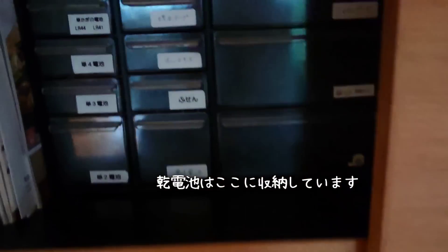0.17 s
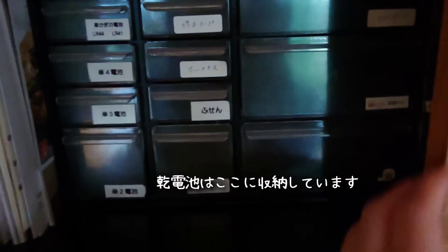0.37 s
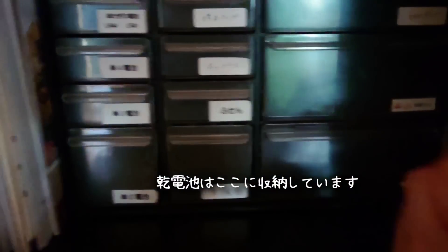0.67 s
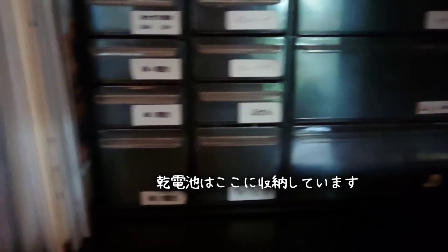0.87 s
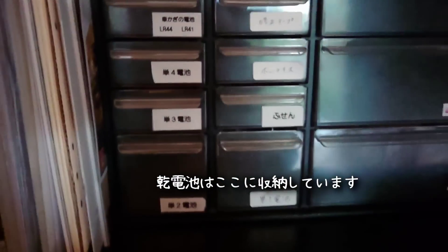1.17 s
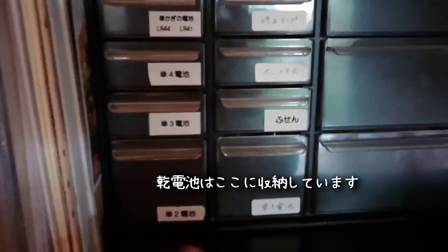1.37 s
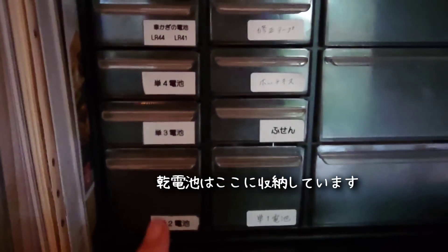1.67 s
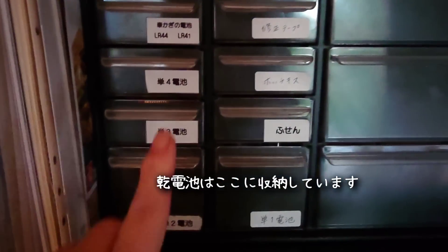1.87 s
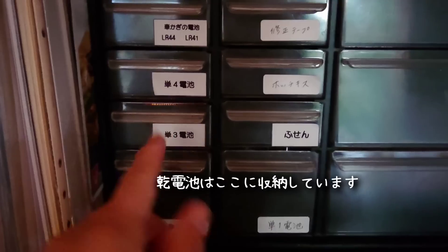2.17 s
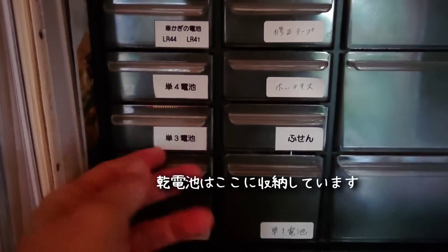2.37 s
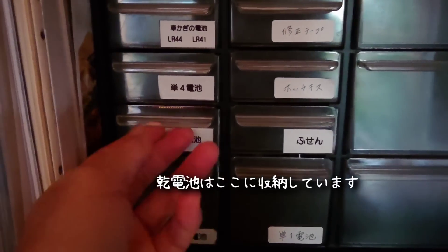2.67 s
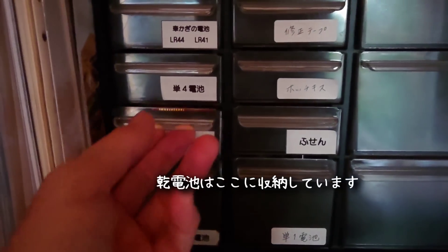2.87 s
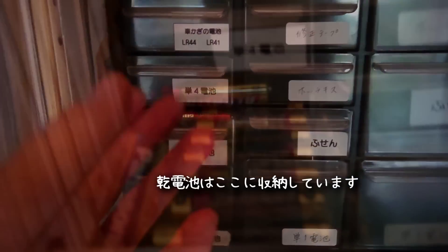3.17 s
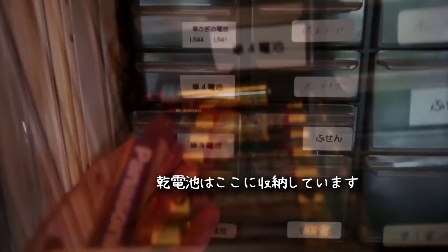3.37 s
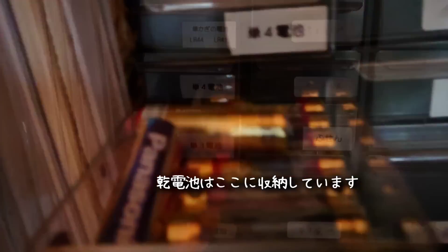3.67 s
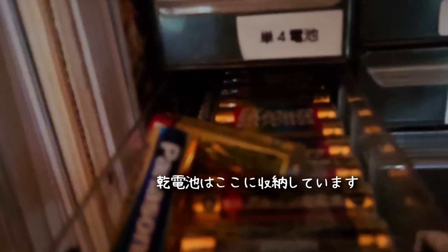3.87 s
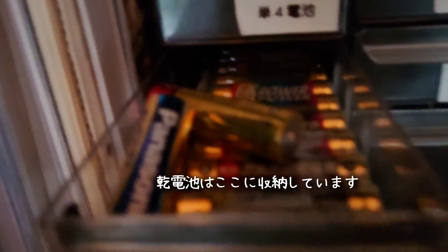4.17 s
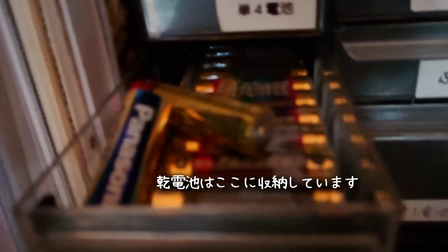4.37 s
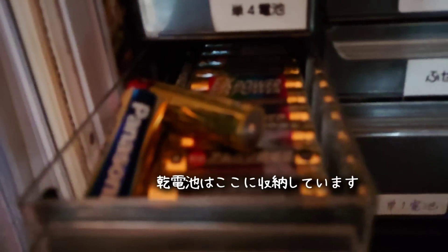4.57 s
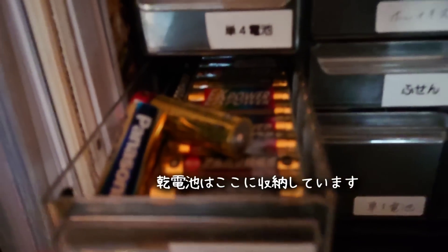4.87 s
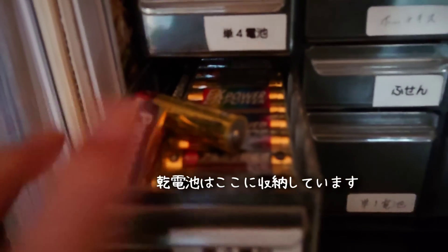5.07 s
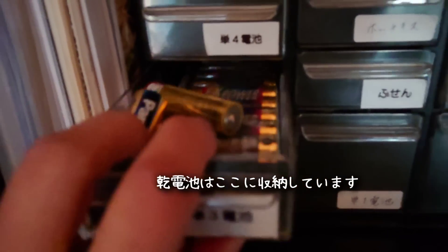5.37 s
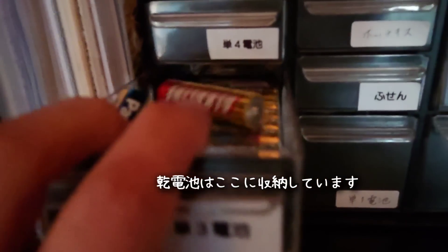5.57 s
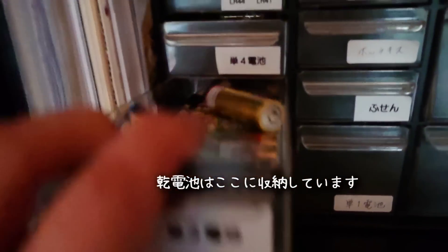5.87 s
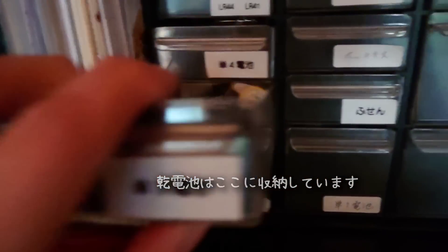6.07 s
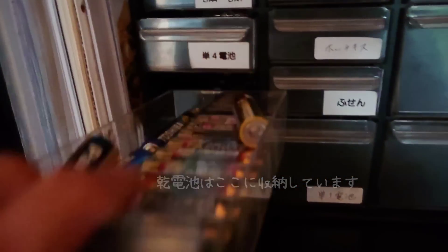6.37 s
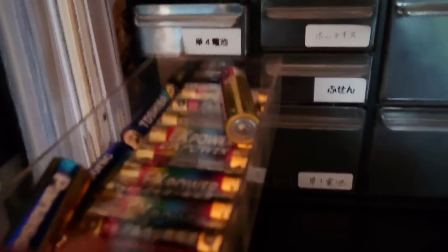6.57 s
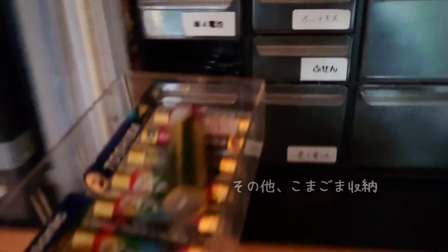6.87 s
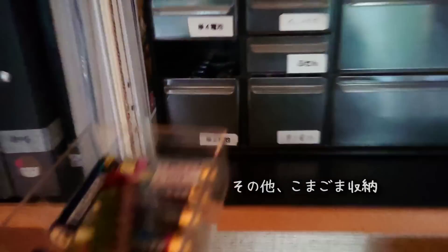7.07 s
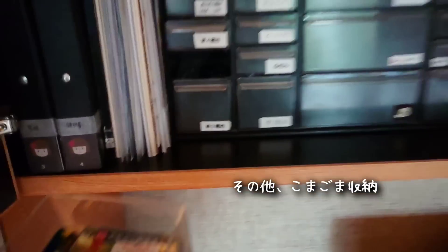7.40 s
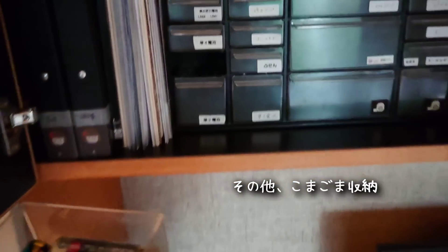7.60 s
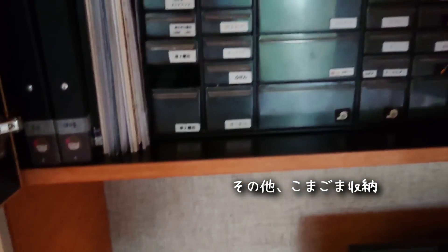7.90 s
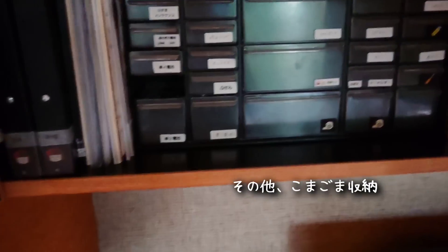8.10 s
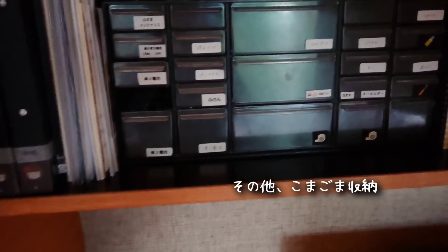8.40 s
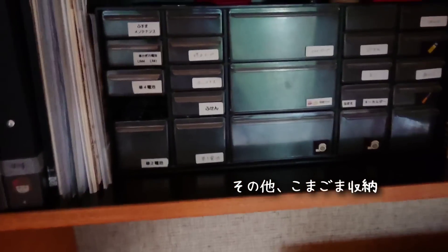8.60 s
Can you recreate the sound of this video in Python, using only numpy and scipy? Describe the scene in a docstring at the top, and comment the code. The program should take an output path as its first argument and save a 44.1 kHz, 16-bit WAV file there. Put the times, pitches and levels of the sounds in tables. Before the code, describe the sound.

Over quiet mains hum, a woody door knock, then close plastic clacks and rattling batteries as a little drawer is pulled out and put down.

```python
"""Under a wavering mains hum, room rumble and a faint hiss, a wooden cabinet door bumps against its stop.
Then a small plastic drawer full of batteries is pulled out, rattles, is pushed about and set down on the floor.
Half-sine pushes ring the cabinet panels; flurries of micro-contacts ring the drawer, its cells and the catch.
Grainy noise makes the slides, shaped noise the hissy rubs, and decaying noise the reverb, on two close ports."""
import sys
import numpy as np
from scipy import signal
from scipy.fft import rfft, irfft, next_fast_len
from scipy.io import wavfile
from scipy.ndimage import uniform_filter1d

SR = 44100
rng = np.random.default_rng(int(sys.argv[2]) if len(sys.argv) > 2 else 0)


def put_to_file(sound):
    """Save the sound as 16-bit audio at rate SR, in the file named by the first command-line argument."""
    columns = np.atleast_2d(sound).T  # one column per channel
    safe = np.clip(columns, -1, 1)
    whole_steps = np.round(safe * 32767)
    wavfile.write(sys.argv[1], SR, whole_steps.astype(np.int16))


N = 385434

# background over time: time_s, rumble_db, hum_db (before its waver and port trims), background_hiss_db
BACKGROUND_LEVELS = [(0, -57, -57, -69), (.87, -51.5, -57, -63.5), (1.36, -54, -52.5, -64.5),
                     (2.56, -57, -51.5, -73.5), (3.6, -47.5, -48, -61.5), (4.2, -56, -50.5, -70.5),
                     (5.33, -57, -50.5, -72.5), (6.35, -52, -49.5, -68), (7.5, -60.5, -53, -67),
                     (8.74, -55, -56, -63)]
# knocks of drawer and cells, in the hand until LAID_S, then on the floor: start_s, level_db,
# boom_db, clink_db (both relative to level_db), knock_pitch_hz, clink_pitch_hz, chatter_ms
DRAWER_KNOCKS = [(2.713, -41, -4, -19, 1070, 2330, 4.9), (2.739, -40.5, -1, -3, 1100, 2420, 4.6),
                 (2.792, -42, -7, -9, 1420, 4170, 3.5), (2.957, -39, 6, -33, 1150, 2470, 2.4),
                 (3.044, -46, 3, -7, 1820, 2440, 3.5), (3.06, -18, -10, -9, 1110, 2960, 6.3),
                 (3.098, -37.5, 5.5, -12, 1400, 2360, 6.4), (3.15, -37.5, 3, 6, 1350, 3920, 3.2),
                 (3.222, -39, 5, -13, 1080, 2700, 5.5), (3.239, -23.5, 3, 0, 1140, 2740, 5.9),
                 (3.25, -13, -7, 2.5, 1320, 3950, 3.1), (3.293, -10, -0.5, -4.5, 1880, 2520, 5.1),
                 (3.32, -15, -19, -2.5, 1690, 3320, 3.8), (3.584, -14.5, -7, -7.5, 1340, 2950, 3.1),
                 (3.695, -16.5, -15, -3, 1270, 4300, 3.7), (3.702, -19.5, -5, -2.5, 1350, 3030, 2.4),
                 (3.741, -22.5, -14, -19, 1470, 2490, 2.5), (3.799, -12.5, -34, -2.5, 1450, 4000, 3.1),
                 (3.806, -21.5, -11, -4, 1300, 3170, 3.4), (3.863, -36.5, 0, 1, 1100, 3480, 3.5),
                 (3.897, -8.5, -15.5, -9.5, 1394, 2980, 2.94), (3.975, -35, -19, -20, 1280, 2690, 2.8),
                 (4.001, -18.5, -45, -16, 1350, 2650, 2.7), (4.021, -40.5, -22, 10, 1370, 3280, 2.8),
                 (4.057, -29, -1, -18, 1330, 3100, 4.3), (4.077, -25.5, -7, -17, 1360, 3030, 1.1),
                 (4.117, -38, -31, -23, 1350, 2750, 5.8), (4.289, -58.5, 1, 22, 1920, 3400, 2.2),
                 (4.364, -63, -20.5, 13, 1820, 2960, 3.5), (5.324, -36, -8.5, -3, 1400, 4500, 7.9),
                 (5.354, -22.5, -8, -3, 1470, 3100, 2.9), (5.528, -43, -20, -28, 1270, 2470, 3.5),
                 (5.542, -58, 15, -21, 1100, 2580, 4.7), (5.558, -23.5, 5, -3, 1360, 3650, 3.1),
                 (5.576, -21, -7, -5.5, 1210, 3650, 2.8), (5.602, -43, 8.5, -12, 1190, 2380, 5.6),
                 (5.642, -42, 9, 2, 1310, 4350, 9.4), (5.753, -24, -12, -15, 1260, 3100, 3.1),
                 (5.776, -24, -9.5, -33, 1430, 2420, 3.9), (5.838, -34, 1, -14, 1330, 3360, 3.2),
                 (5.998, -44, 6.5, -11, 1300, 2150, 3.2), (5.979, -36.5, -6, -17, 1380, 2940, 4.1),
                 (6.05, -38.5, -15, 11.5, 1300, 3730, 5.5), (6.064, -32.5, 5, -1, 1290, 2800, 6.7),
                 (6.075, -16.5, -2, -2, 1260, 2100, 3.3), (6.088, -38.5, 12.5, -10, 1350, 3310, 4.8),
                 (6.102, -35, -14, -6, 1090, 4360, 2.3), (6.144, -26, -5, 3.5, 1350, 4300, 4.8),
                 (6.177, -29, -5.5, 4, 1350, 4100, 4.4), (6.249, -23.5, -5.5, -8.5, 1780, 2570, 3),
                 (6.299, -16, -11, -15, 1440, 2070, 5.3), (6.346, -29, -1, -21, 1220, 2180, 2.8),
                 (6.356, -34.5, 0, -3, 1380, 4760, 8.8), (6.398, -39, 6, 5.5, 1250, 3500, 4.1),
                 (6.477, -15, -6.5, -3, 1196, 2740, 5), (6.61, -35.5, 1, 3, 1400, 4100, 3.5),
                 (7.063, -45.5, -5, 5.5, 1040, 2930, 1.8), (7.248, -41, 0, -27, 1100, 2710, 3.9),
                 (7.446, -35, -2.5, -9.5, 1770, 3380, 3.5), (7.472, -40, 1.5, -18, 1440, 2290, 3),
                 (7.603, -22.5, -9, -14, 1720, 2910, 10.3), (7.623, -14.5, -13, -4.5, 1810, 2930, 5.5),
                 (7.651, -12, -15.5, 1, 1900, 2900, 6.7), (7.679, -17.5, -17, 0, 1580, 3000, 10.5),
                 (7.706, -12.5, -9.5, -2, 1780, 3630, 8.1), (7.796, -24, -13, -34, 1520, 3670, 9),
                 (7.962, -38.5, 4, -23, 1710, 3350, 8.8), (7.973, -23.5, -24, -5.5, 1800, 3640, 2.3),
                 (8.082, -33, 0, -1.5, 1800, 3340, 2.15), (8.576, -46.5, 6, -6, 1300, 2610, 3.7)]
LAID_S = 7.15  # from here the drawer lies on the floor


def undb(db):
    """Gain of a level in dB."""
    return 10 ** (np.asarray(db) / 20)


def unit(x):
    """Scale to rms 1."""
    return x / np.sqrt(np.mean(x ** 2))


def curve(table, column):
    """A table column over time."""
    rows = np.array(table)
    return np.interp(np.arange(N) / SR, rows[:, 0], rows[:, column])


def band(x, lo_hz, hi_hz):
    """Band-pass with edges kept in range."""
    lo_hz = np.clip(lo_hz, 10, .4 * SR)
    hi_hz = np.clip(hi_hz, 1.02 * lo_hz, .45 * SR)
    return signal.sosfilt(signal.butter(2, [lo_hz, hi_hz], "band", fs=SR, output="sos"), x)


def steep_band(x, lo_hz, hi_hz):
    """The same band-pass three times over, for steeper skirts."""
    for _ in range(3):
        x = band(x, lo_hz, hi_hz)
    return x


def coloured(spectrum):
    """Noise with a spectrum of (Hz, dB) points, rms 1."""
    hz, db = np.transpose(spectrum)
    size = next_fast_len(N)
    f = np.arange(1, size // 2 + 2) * SR / size
    gain = undb(np.interp(np.log(f), np.log(hz), db))
    white = rfft(rng.standard_normal(size))
    return unit(irfft(white * gain, size)[:N])


def walk(rate):
    """Random levels held 1 / rate s and slewed twice, rms 1."""
    hold = int(SR / rate)
    steps = np.repeat(rng.standard_normal(N // hold + 1), hold)
    return unit(uniform_filter1d(uniform_filter1d(steps, hold), hold)[:N])


def spread(make, alike):
    """Left and right from two unrelated draws; alike is their correlation."""
    mid = make() * np.sqrt((1 + alike) / 2)
    side = make() * np.sqrt((1 - alike) / 2)
    return np.array([mid + side, mid - side])


def white_pair(length, alike):
    """Two-channel white noise of a length in samples."""
    return spread(lambda: rng.standard_normal(length), alike)


def add(out, sound, s, pan_db, left_lag):
    """Place a two-channel sound; the left port hears it left_lag samples late (negative: the right)."""
    lags = max(left_lag, 0), max(-left_lag, 0)
    trims_db = pan_db / 2, -pan_db / 2
    for channel, (lag, db) in enumerate(zip(lags, trims_db)):
        i = int(s * SR) + int(lag)
        out[channel, i:i + sound.shape[1]] += undb(db) * sound[channel, :N - i]


def room_tone():
    """Slightly wavering air noise, swelling rumble and a transformer hum that wavers in pitch and level."""
    # colour of the air noise: frequency_hz, density_db (dB per Hz)
    air_colour = [(88, -54), (150, -34), (193, -16.5), (270, -4), (354, -13), (484, -18.5), (624, -16.5),
                  (923, -21.5), (998, -23.5), (1260, -25.5), (2310, -31.5), (7770, -50), (14800, -36.5),
                  (16000, -35)]
    air_db, hum_hz = -58, 118.8
    air = spread(lambda: coloured(air_colour), 0.22) * undb(air_db + 1.2 * walk(6))
    rumble = spread(lambda: unit(steep_band(rng.standard_normal(N), 29.7, 158)), 0.83)
    rumble = rumble * undb(curve(BACKGROUND_LEVELS, 1))
    phase = 2 * np.pi * np.cumsum(hum_hz + 0.963 * walk(19)) / SR
    hum_gain = np.sqrt(2) * undb(curve(BACKGROUND_LEVELS, 2) + 1.93 * walk(28))
    hum = hum_gain * np.array([undb(-0.5) * np.sin(phase - .25), undb(2.0) * np.sin(phase)])
    return air + rumble + hum


def strokes():
    """Rows (start s, length s, scrape, roll, hiss dB) of slides, tails, hissy rubs, jostling after knocks."""
    # slides of the drawer and ringing tails after knocks: start_s, length_s, scrape_db, rolling_cells_db
    slides_and_tails = [(2.698, 0.13, -45, -59), (3.044, 0.2, -44.5, -50.5), (3.239, 0.13, -30, -33),
                        (3.352, 0.19, -53, -56), (3.61, .05, -62, -54), (3.838, 0.061, -64, -57),
                        (3.896, 0.069, -49, -52), (4.004, 0.11, -49, -79), (5.555, 0.049, -37.5, -31.5),
                        (5.773, 0.23, -52.5, -52.5), (5.81, 0.65, -54.5, -56), (6.049, 0.041, -36, -39.5),
                        (6.285, 0.24, -43, -49), (7.725, 0.1, -44.5, -46), (7.982, 0.037, -70, -51)]
    # hissy rubs: hand, sleeve, door, and broad tails as the drawer lands: start_s, length_s, hiss_db
    hissy_rubs = [(0.41, 0.27, -62), (0.698, 0.32, -52.5), (0.965, 0.29, -55), (1.471, 0.65, -63),
                  (1.706, 0.13, -53), (2.8, 0.16, -57.5), (3.954, 0.22, -57.5), (5.574, 0.69, -56),
                  (6.994, 0.19, -61), (7.304, 0.94, -58.5), (7.614, 0.031, -39), (7.704, 0.23, -56.5),
                  (8.523, 0.22, -61)]
    slide_hiss_db, rub_scrape_db = -7.5, -6.5  # relative to the slide's scrape, to the rub's hiss
    # after each knock the load jostles on, its scrape set against the boom and its hiss against the clink
    jostle_s, jostle_scrape_db, jostle_hiss_db = 0.1, -27.5, -39
    silent = -np.inf
    rows = [(s, length, scrape, roll, scrape + slide_hiss_db) for s, length, scrape, roll in slides_and_tails]
    rows += [(s, length, hiss + rub_scrape_db, silent, hiss) for s, length, hiss in hissy_rubs]
    for s, db, boom, clink, *_ in DRAWER_KNOCKS:
        rows.append((s, jostle_s, db + boom + jostle_scrape_db, silent, db + clink + jostle_hiss_db))
    return rows


def stroke_gain(column, rise=0.051):
    """Gain over time of one layer: each stroke sets in over the fraction rise and eases off."""
    power = np.zeros(2 * N)
    for row in strokes():
        u = np.linspace(0, 1, int(row[1] * SR))
        start = int(row[0] * SR)
        shape = np.minimum(u / rise, 1) * (1 - u ** 1.59)
        power[start:start + len(u)] += (undb(row[column]) * shape) ** 2
    return np.sqrt(power[:N])


def rustle():
    """A faint background hiss that slowly swells and fades, plus uneven puffs of hiss on each stroke."""
    # colour of the hiss: frequency_hz, density_db (dB per Hz)
    hiss_colour = [(500, 2), (1500, 0), (4000, -1.5), (9000, -8.5), (15500, -10)]
    unevenness_db = 2.5 * walk(70) + 1.8 * rng.exponential(size=N)
    puffs = stroke_gain(column=4) * undb(unevenness_db)
    background = undb(curve(BACKGROUND_LEVELS, 3))
    return spread(lambda: coloured(hiss_colour), 0.033) * np.hypot(undb(-3.0) * puffs, background)


def knocks(events, modes, crack_db, pan_db, left_lag, fill_db, scatter_db=3, damping=2.5, alike=0.6):
    """Micro-contact flurries ring the body and crack in the treble: (whole sound, broad clicks alone)."""
    knock_width_hz, clink_width_hz = 62, 110  # own ring of each knock, before damping
    own_clink_db = 3  # the knock's own clink over the shared modes
    snap_db, snap_ms = 7, 0.56  # the first contact is the hardest; level before a tenfold cut
    out, t = np.zeros((2, 2, N)), np.arange(2400) / SR
    for s, level_db, boom_db, clink_db, knock_hz, clink_hz, ms in events:
        hz, width, db = np.transpose(modes)
        group = np.append(np.digitize(hz, [1000, 2100]), [1, 2])  # boom, knock, clink
        # the shared modes vary a little in pitch and level at each knock, drawn at random
        chance = rng.standard_normal((2, len(hz)))
        hz = np.append(hz * (1 + .03 * chance[0]), [knock_hz, clink_hz])
        width = damping * np.append(width, [knock_width_hz, clink_width_hz])
        gain = undb(np.append(db + scatter_db * chance[1], [0, own_clink_db]))
        rings = gain * np.sin(2 * np.pi * hz * t[:, None]) * np.exp(-np.pi * width * t[:, None])

        sizes = undb(2.1 * rng.exponential(size=len(t)))
        age = t * 1000 / max(ms, .3)
        chatter = np.exp(-age) * (1 - np.exp(-age / 1.05))
        snap = undb(snap_db) * np.exp(-t * 1000 / snap_ms) / 10
        # the two ports see the contacts from different sides
        flurry = white_pair(len(t), alike) * sizes * (chatter + snap)

        groups, clicks = [], []
        for k, (lo_hz, hi_hz) in enumerate(((300, 950), (1000, 2100), (1900, 4400))):
            ring = rings[:, group == k].sum(axis=1)
            ring = signal.fftconvolve(flurry, ring[None], axes=1)[:, :len(t)]
            # a broad click fills the gaps between the modes
            click = unit(band(flurry, lo_hz, hi_hz))
            clicks.append(click)
            groups.append(unit(ring) + undb(fill_db) * click)
        crack = band(flurry, 4500, 16000)
        groups.append(crack)
        clicks.append(crack)
        gains = undb([boom_db, -3, clink_db, clink_db + crack_db])
        for layer, parts in zip(out, (groups, clicks)):
            knock = sum(g * x / np.abs(x).max() for g, x in zip(gains, parts))
            add(layer, undb(level_db) * knock, s, pan_db, left_lag)
    return band(out, 150, 17000)


def slides():
    """Stick-slip grains scrape on each stroke; a narrow band keeps the main drawer mode singing as cells roll."""
    # main drawer mode under rolling cells, in the hand, then on the floor: pitch_hz, half_width_hz
    roll_modes = [(1310, 107), (1750, 110)]
    grains = rng.standard_normal((2, N)) * undb(3.0 * rng.exponential(size=(2, N)))
    rub = band(grains[0], 170, 1100) + undb(-6.5) * band(grains[0], 1100, 4300)
    scrape = unit(rub * undb(6 * walk(110)))
    throb = undb(4.5 * walk(80))
    held, laid = (unit(band(grains[1], hz - width, hz + width) * throb) for hz, width in roll_modes)
    roll = np.where(np.arange(N) < LAID_S * SR, held, laid)
    drag = stroke_gain(column=2) * scrape + stroke_gain(column=3) * roll
    return np.array([drag, np.roll(drag, 5)])  # the right port hears it 5 samples late


def door_detail():
    """The hinge squeaks faintly in narrow noise; the hard blow then leaves a noisy woody wash."""
    squeak_at_s, squeak_s, squeak_hz, squeak_db = .445, .2, 1520, -62
    blow_at_s, wash_db, wash_t60_s, wash_lo_hz, wash_hi_hz = .831, -41.5, 0.9, 252, 2798
    out, t = np.zeros((2, N)), np.arange(int(.5 * SR)) / SR
    squeak = unit(band(white_pair(len(t), .7), squeak_hz - 80, squeak_hz + 80))
    add(out, undb(squeak_db) * squeak * np.clip(1 - t / squeak_s, 0, 1), squeak_at_s, -1.5, 6)
    wash = unit(band(white_pair(len(t), 1.0), wash_lo_hz, wash_hi_hz))
    add(out, undb(wash_db) * wash * np.exp(-np.log(1000) * t / wash_t60_s), blow_at_s, -1.5, 6)
    return out


def cabinet():
    """A half-sine push rings the panels; a longer contact leaves only the low modes."""
    # low thumps of the door, and of the cabinet shaken by the drawer:
    # start_s, level_db (peak before panning), contact_ms
    cabinet_bumps = [(0.724, -24.5, 10.5), (0.784, -17, 8.8), (0.8304, -7.5, 0.63), (0.8377, -6.5, 2.8),
                     (0.8443, -10, 3.3), (0.962, -27, 3.6), (1.277, -35.5, 6.3), (1.706, -33.5, 3.07),
                     (1.768, -36, 8.3), (3.246, -21, 3.7), (3.296, -39, 7.1), (5.564, -30.5, 2.2),
                     (7.379, -43, 13.6), (7.902, -38, 5.6), (8.198, -38, 11), (8.571, -34, 5.5)]
    # panel modes: pitch_hz, level_db, t60_s (of the long ring)
    panel_modes = [(81.2, 6, 0.31), (111, -21, 0.38), (156, 5.5, 0.092), (207.4, 3, 0.13), (221, -16, 1),
                   (305, -1.5, 0.22), (440, -14.5, 0.9), (535.3, 0.5, 0.54), (650, -13, 0.18),
                   (771, 7, 0.23), (832, -0.5, 0.3), (973, -5, 0.73), (1265, -0.5, 0.14), (1440, -2, 0.5),
                   (2500, -11, 0.11)]
    thud_db, thud_share = 8, 0.25  # thud over the long ring, and its decay time as a share of t60
    twin_split = .025  # each mode has a close twin, so the ring throbs at this share of its pitch
    out, t = np.zeros((2, N)), np.arange(int(.7 * SR))[:, None] / SR
    hz, db, t60 = np.transpose(panel_modes)
    decay = np.log(1000) * t / t60
    throb = 1 + .7 * np.sin(2 * np.pi * twin_split * hz * t)
    # most energy leaves in a short thud, the rest rings on
    envelope = np.exp(-decay) * throb + undb(thud_db) * np.exp(-decay / thud_share)
    ring = undb(db) * np.sin(2 * np.pi * hz * t) * envelope
    # panels are too small to radiate the deepest bass
    ring = steep_band(ring.sum(axis=1), 81, 6000)
    for s, level_db, ms in cabinet_bumps:
        n = max(ms, .2) * SR / 1000
        push = np.sin(np.pi * np.clip(np.arange(1, int(n) + 2) / (n + 1), 0, 1))
        bump = signal.fftconvolve(ring, push)
        bump = bump * undb(level_db) / np.abs(bump).max()
        add(out, np.tile(bump, (2, 1)), s, -2.5, 15 if ms > 2 else 6)
    return out


def ticks():
    """Bright ticks of steel on steel, catch and cells: short treble-only flurries with no box under them."""
    # ticks: start_s, level_db (peak before panning)
    steel_ticks = [(0.823, -31), (0.84, -34), (0.962, -21.5), (2.764, -34), (3.045, -37), (3.095, -33.5),
                   (3.109, -29), (3.24, -23.5), (3.25, -16), (3.292, -21), (3.323, -20), (3.863, -33.5),
                   (4.023, -37.5), (4.286, -38), (4.422, -53), (4.962, -45), (5.062, -56), (5.438, -46),
                   (5.659, -44), (6.103, -35), (6.359, -28.5), (7.544, -37), (7.681, -22.5)]
    decay_ms, low_hz = 3.03, 3030
    out, age = np.zeros((2, N)), np.arange(1200) * 1000 / SR / decay_ms
    envelope = np.exp(-age) * (1 - np.exp(-age / .5))
    for s, level_db in steel_ticks:
        tick = band(white_pair(len(age), .5) * envelope, low_hz, 15500)
        add(out, undb(level_db) * tick / np.abs(tick).max(), s, -.8, -4)
    return out


def reverb(x, wet_db, t60_s):
    """A small room: decaying noise, the treble dying first."""
    t = np.arange(int(.6 * SR)) / SR
    noise = white_pair(len(t), 0.38)
    fall = np.log(1000) * t / t60_s
    body = band(noise, 140, 5140) * np.exp(-fall)
    treble = undb(-5.5) * band(noise, 2400, 16800) * np.exp(-1.3 * fall)
    tail = (body + treble) * (1 - np.exp(-t / 0.0001))
    tail = tail / np.sqrt(np.sum(tail ** 2) / 2)
    return undb(wet_db) * signal.fftconvolve(x.mean(axis=0)[None], tail, axes=1)[:, :N]


def scene():
    """All sources; the room returns broad clicks, ticks and slides, and the hollow cabinet rings longer."""
    # door catch knocks: start_s, level_db, boom_db, clink_db, knock_pitch_hz, clink_pitch_hz, chatter_ms
    catch_knocks = [(.312, -49, 5, -25, 1010, 2500, 6.1), (.443, -43, -18, -25, 1500, 2500, 3),
                    (0.8315, -15.5, 5.5, -11.5, 1400, 2700, 4.1), (0.9626, -23.5, -3, 3.5, 1875, 2890, 9.1)]
    # modes of the catch, the drawer in the hand and on the floor:
    # pitch_hz, width_hz (before damping), level_db (pitch and level vary at each knock)
    catch_modes = [(960, 170, 0), (1400, 90, -11), (3630, 320, -20), (5600, 360, -5)]
    held_modes = [(338, 49, -2), (530, 450, -21), (780, 510, -7.5), (808, 140, 7), (1100, 320, -74),
                  (2690, 69, 0.5), (3140, 66, -5.5), (3730, 360, -8), (4500, 370, -4)]
    laid_modes = [(530, 170, -20), (990, 47, 12), (1500, 190, -25), (1750, 140, -18), (1970, 60, -7),
                  (2380, 83, 10), (2970, 160, 18), (3500, 100, -11), (5630, 110, 2)]
    drawer_crack_db, catch_crack_db = -21.5, -4  # treble crack against the clink
    held = [k for k in DRAWER_KNOCKS if k[0] < LAID_S]
    laid = [k for k in DRAWER_KNOCKS if k[0] >= LAID_S]
    struck = knocks(catch_knocks, catch_modes, catch_crack_db, pan_db=-1.6, left_lag=27, fill_db=0.71)
    struck += knocks(held, held_modes, drawer_crack_db, pan_db=0.11, left_lag=-4.0, fill_db=-3.5)
    struck += knocks(laid, laid_modes, drawer_crack_db, pan_db=6.0, left_lag=-12.0, fill_db=0.5)
    # ticks and slides join both the whole sound and what the room returns
    drawer, to_room = struck + ticks() + slides()
    door = door_detail() + cabinet()
    drawer = drawer + reverb(to_room, wet_db=-17, t60_s=0.31)
    door = door + reverb(door, wet_db=-15.5, t60_s=0.52)
    return room_tone() + rustle() + drawer + door


def record(dry):
    """The recorder cuts the top with a steep low-pass at 15.7 kHz."""
    return signal.sosfilt(signal.ellip(10, .2, 80, 15700, fs=SR, output="sos"), dry)


dry = scene()
out = record(dry)
put_to_file(out)
```